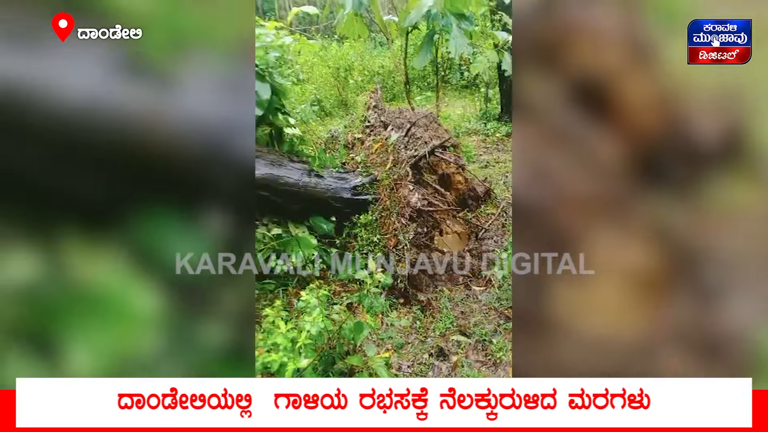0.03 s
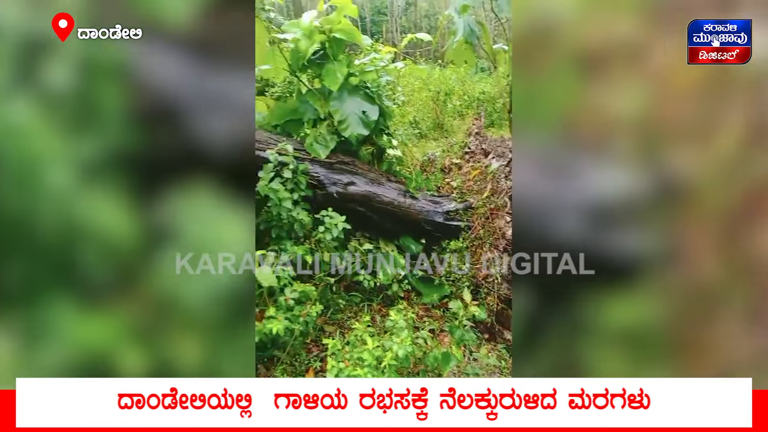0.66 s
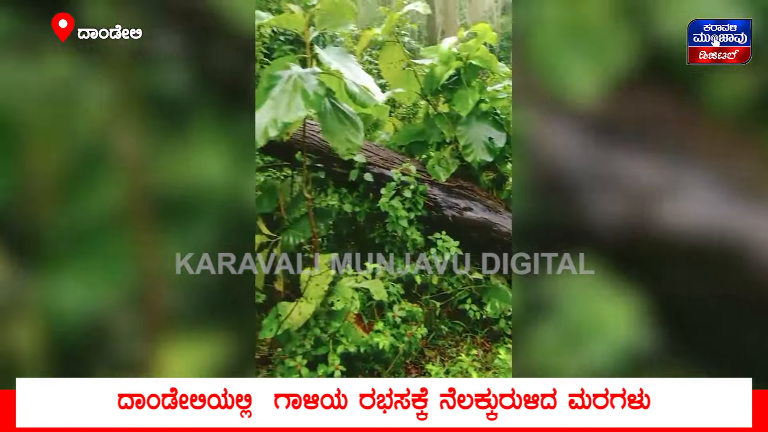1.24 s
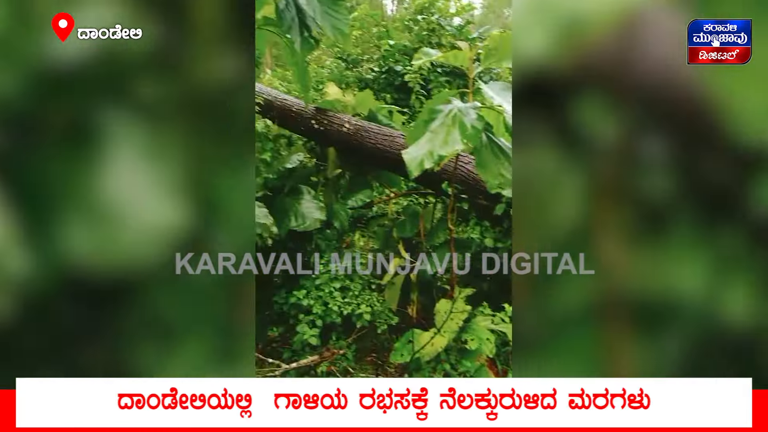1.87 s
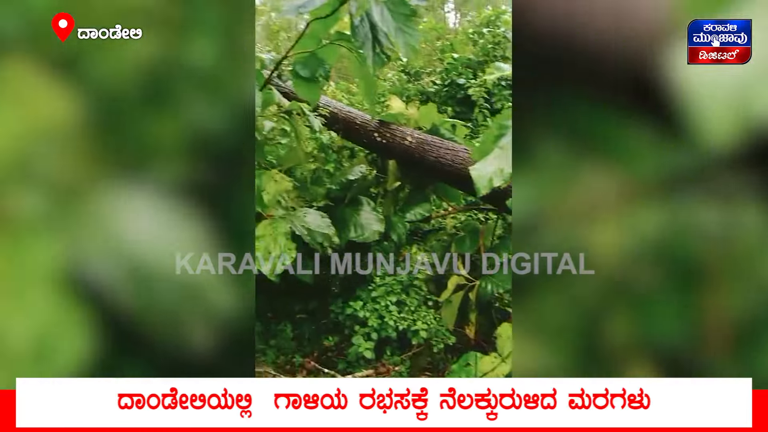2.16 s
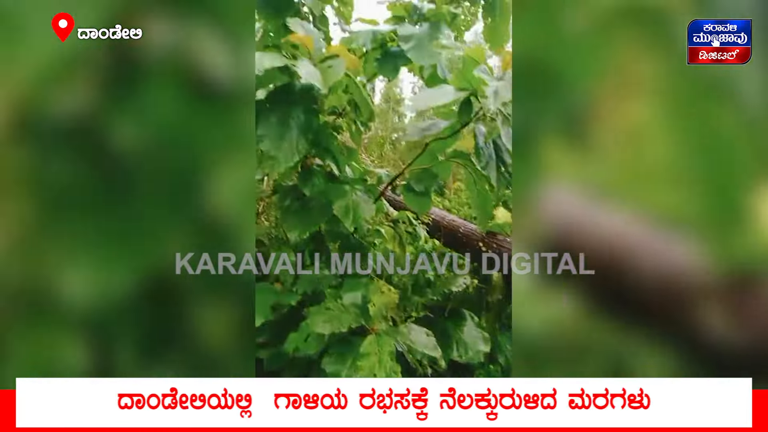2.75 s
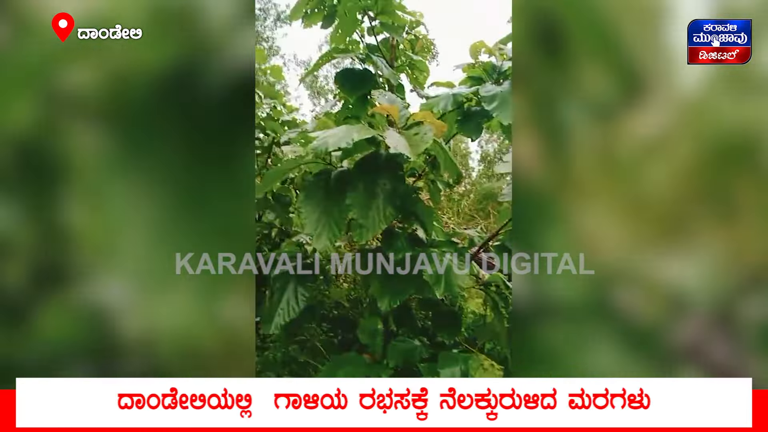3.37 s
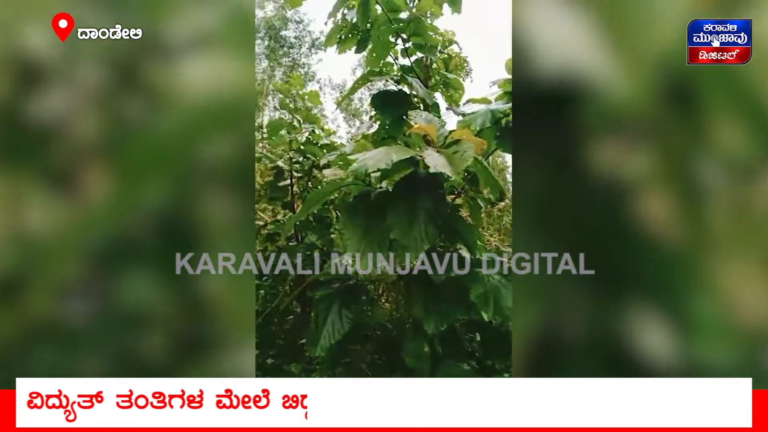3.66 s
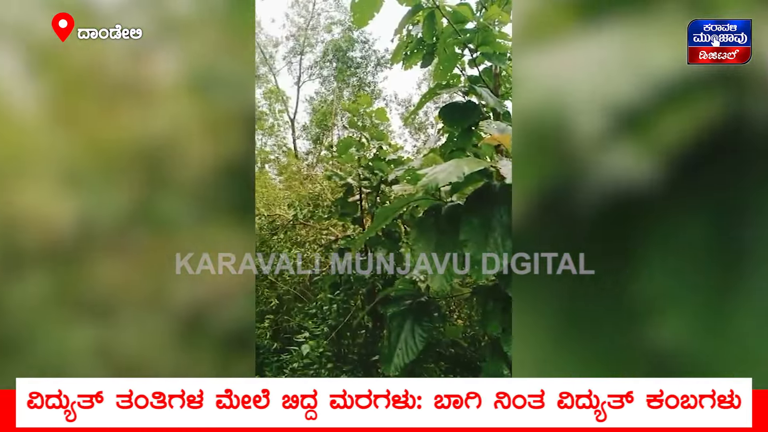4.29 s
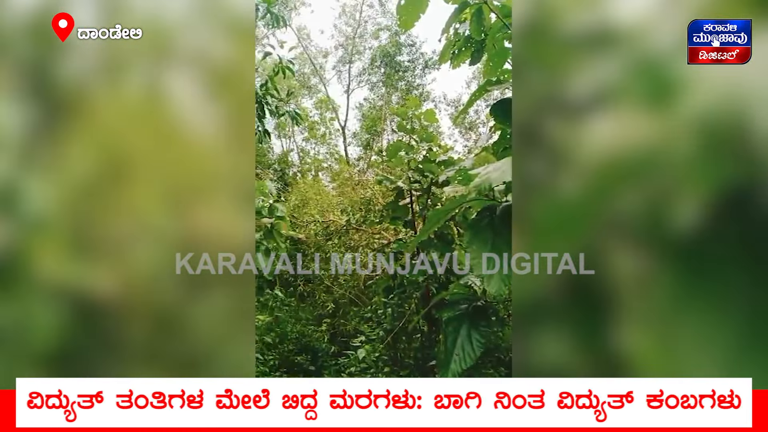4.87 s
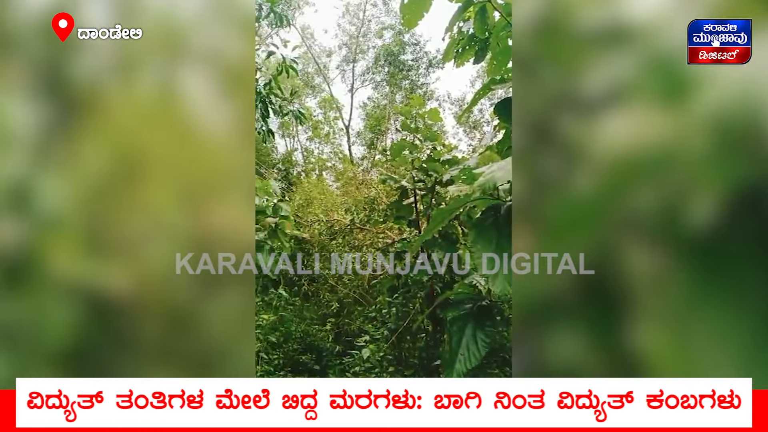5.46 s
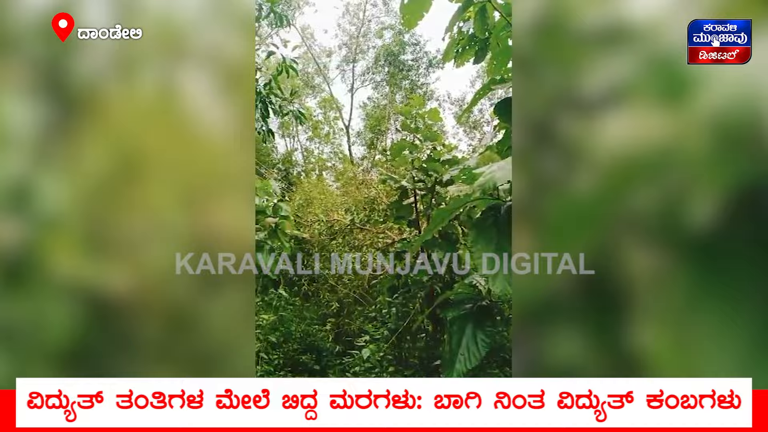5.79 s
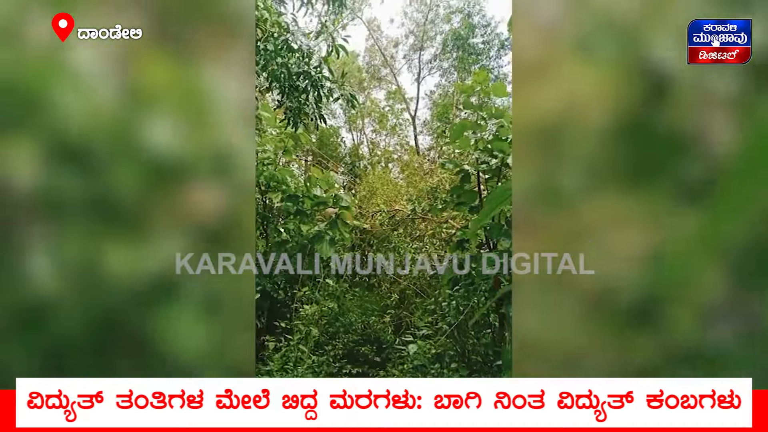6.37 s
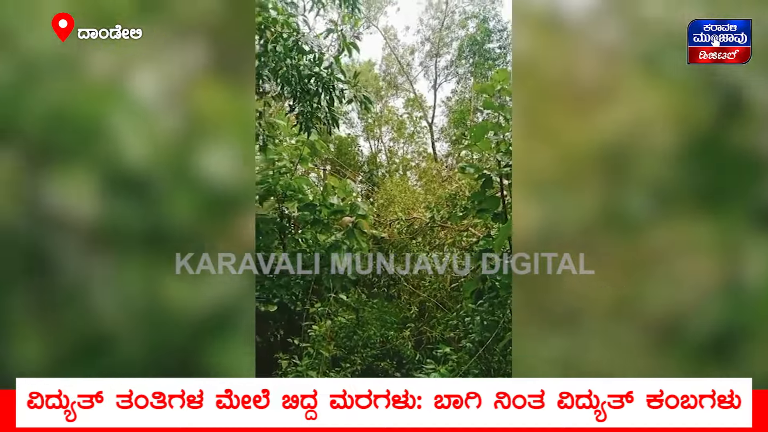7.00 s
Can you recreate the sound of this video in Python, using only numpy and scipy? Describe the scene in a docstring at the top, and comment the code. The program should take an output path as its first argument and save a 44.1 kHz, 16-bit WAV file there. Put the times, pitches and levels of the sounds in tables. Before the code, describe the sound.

A soft wash of rain on broad foliage, dotted with dull leaf drips and sharp, close drop taps on the right.

```python
"""A steady wash of rain on broad forest leaves, made of countless far drops, with nearer ones pattering.
Heavy drips slap nearby leaves. The listener is a hand-held camera with two microphone ports (openings):
a few drops land by the right port as sharp taps, and later something brushes softly and droplets tick
at the left. A limiter briefly turns the rain down around the hardest taps."""
import sys
import numpy as np
from scipy import signal
from scipy.io import wavfile
from scipy.ndimage import uniform_filter1d, minimum_filter1d

SR = 44100
rng = np.random.default_rng(int(sys.argv[2]) if len(sys.argv) > 2 else 0)


def master_out(mix):
    """Clip the mix to full scale and print it as 16-bit PCM to the path in sys.argv[1]."""
    frames = np.transpose(np.atleast_2d(mix))
    ceiling = np.clip(frames, -1, 1)
    pcm = np.round(ceiling * 32767).astype(np.int16)
    wavfile.write(sys.argv[1], SR, pcm)


N = 310023


def gain_of(db):
    """Turns decibels into a number to multiply a sound by."""
    return 10 ** (np.asarray(db) / 20)


def unit_level(x):
    """Scales a signal to an average (rms) level of 1."""
    return x / np.sqrt(np.mean(x ** 2) + 1e-20)


def curve_at(points, hz):
    """Reads a curve drawn through (pitch_hz, value) points on a logarithmic pitch axis."""
    point_hz, value = np.transpose(points)
    return np.interp(np.log(hz + 1), np.log(point_hz + 1), value)


def add(mix, start_s, sound):
    """Mixes a stereo sound in at its start time."""
    part = mix[:, round(start_s * SR):][:, :sound.shape[1]]
    part += sound[:, :part.shape[1]]


def panned(x, lean_db):
    """Makes the left side louder than the right by lean_db."""
    return gain_of([[lean_db / 2], [-lean_db / 2]]) * x


def resonate(x, hz, width_hz):
    """Makes a sound ring around one pitch; a wider band rings more briefly."""
    b, a = signal.iirpeak(min(hz, SR / 2 - 1), hz / width_hz, fs=SR)
    return signal.lfilter(b, a, signal.lfilter(b, a, x))


def splash(decay_s, size=1024):
    """A burst of spray: noise that dies away."""
    return rng.standard_normal(size) * np.exp(-np.arange(size) / SR / decay_s)


# How hard it rains as time passes: time_s, relative_level_db
RAIN_STRENGTH = [(0.0, -51), (0.62, -48.5), (1.1, -48.5), (1.5, -48), (2.4, -48.4), (5.01, -49),
                 (5.42, -46.5), (6.23, -47.5), (6.52, -48), (6.89, -47.5), (7.03, -48)]


def rain_swell_db(t):
    """How far the rain is above or below its usual level at times t."""
    time_s, level_db = np.transpose(RAIN_STRENGTH)
    return np.interp(t, time_s, level_db - np.median(level_db))


# The tone of the far rain, from bass to treble: pitch_hz, relative_level_db
WASH_TONE = [(20, 10.5), (45, -1.5), (110, 1), (250, -2.5), (700, -1), (1400, -3.5), (1750, -1), (2200, 2),
             (2850, -2), (3400, -10), (4900, -9), (6200, -19.5), (7600, -28), (9900, -33.5), (11400, -27),
             (12400, -30), (13450, -27), (14300, -25.5), (15600, -38)]
# Which side it leans to: pitch_hz, left_minus_right_db
WASH_LEAN = [(60, -0.87), (110, -0.86), (200, -0.66), (380, -1.1), (700, -1.4), (1290, 1), (2380, 0.14),
             (4400, 2), (8120, 2), (15000, 0.7)]
# How alike the two sides are: pitch_hz, likeness (0 unrelated, 1 the same)
WASH_LIKENESS = [(25, 0.85), (60, 1), (150, 0.97), (380, 0.93), (950, 0.48), (2380, 0.03), (5980, 0.01),
                 (15000, 0.01)]


def far_wash(level_db=-44.0, patchy_db=0.54, flicker_db=0.5, bass_share=0.11):
    """Far drops merge into a hiss; its bass is steadier and nearly the same on both sides."""
    # noise is built as a grid of pitches by short time slices
    slices, hz = N // 256 + 5, np.fft.rfftfreq(1024, 1 / SR)
    a, b, c, d, patches = rng.standard_normal((slices, 513, 5)).T
    left, unrelated = a + 1j * b, c + 1j * d
    likeness = np.clip(curve_at(WASH_LIKENESS, hz), -1, 1)[:, None]
    grid = np.array([left, likeness * left + np.sqrt(1 - likeness ** 2) * unrelated])
    # smoothed noise makes the level waver, in patches and as a whole
    patches = uniform_filter1d(patches, size=14, axis=0)
    patches = unit_level(uniform_filter1d(patches, size=6, axis=1))
    flicker = unit_level(uniform_filter1d(rng.standard_normal(slices), size=4))
    swell_share = curve_at([(300, bass_share), (2000, 0.94)], hz)[:, None]
    swell_db = swell_share * (rain_swell_db(np.arange(slices) * 256 / SR) + flicker_db * flicker)
    tone_db = curve_at(WASH_TONE, hz)[:, None]
    grid *= gain_of(tone_db + patchy_db * patches + swell_db) / np.sqrt(1 + likeness)
    grid *= panned(1, curve_at(WASH_LEAN, hz)).reshape(2, -1, 1)
    hiss = signal.istft(grid, nperseg=1024, noverlap=768)[1][:, :N]
    return gain_of(level_db) * unit_level(hiss)


def leaf_patter(level_db, low_hz, high_hz, drops_per_s, spread_db, decay_s, leaves=36):
    """Drops of uneven size strike many leaves at random; each leaf has its own dull note and place."""
    out = np.zeros((2, N))
    for hz in np.geomspace(low_hz, high_hz, leaves):
        sizes = gain_of(spread_db * np.minimum(rng.exponential(1, N), 3))
        hits = sizes * (rng.random(N) < drops_per_s / leaves / SR)
        pat = np.array([unit_level(resonate(splash(decay_s), hz, 0.48 * hz)) for port in range(2)])
        pat = panned(pat, rng.normal(0, 1.5))
        out += signal.oaconvolve(hits[None], pat, axes=1)[:, :N]  # one pat at every hit
    return gain_of(level_db + rain_swell_db(np.arange(N) / SR)) * unit_level(out)


# The heaviest drips on nearby leaves: start_s, relative_peak_db, left_minus_right_db, pitch_hz
LEAF_DRIPS = [(1.158, -29.5, 2, 1450), (1.751, -33.5, -4, 820), (2.786, -33, 1, 2080), (2.82, -31, 4, 2070),
              (3.589, -29, -3, 1360), (4.285, -36, -1, 950), (4.406, -36, -2, 620), (5.462, -31.5, 0, 1800),
              (5.636, -35, -2, 1250), (5.757, -36.5, -2, 645), (6.484, -28.5, 2, 2190)]


def heavy_drips(level_db=-2, decay_s=0.012, damping=0.74):
    """A heavy drip slaps a leaf, which answers with a dull note; each port hears its own scatter of it."""
    out = np.zeros((2, N))
    for start_s, peak_db, lean_db, hz in LEAF_DRIPS:
        slap = np.array([resonate(splash(decay_s), hz, damping * hz) for port in range(2)])
        slap /= abs(slap).max()
        add(out, start_s, panned(gain_of(peak_db + level_db) * slap, lean_db))
    return out


# Drops landing by the right port, each pushing once more as it collapses: start_s, gain_db, ring_hz,
# ring_width_hz, thud_db, upper_ring_db, tick_db (these three relative to the main ring),
# collapse_delay_s, collapse_share (0 to 1 of the first push)
CASING_TAPS = [(2.2286, 15.4, 2440, 980, -45, -2.5, -37, 0.000098, .68),
               (2.3545, 20.6, 2780, 850, 7.3, -6.3, -31, .00064, .72),
               (3.3513, 12.2, 2630, 1250, -40, -0.5, -30, 0.0003, 0.19),
               (3.4926, 21.8, 2230, 690, -7.8, -13.5, -40, .00068, .33),
               (4.6556, 17.4, 2300, 1150, -20, -4.5, -32, .00011, .77),
               (4.7213, 12.3, 2170, 1700, -11.5, 5, -14.5, .00011, 0.4),
               (5.1393, 13, 2250, 1100, -32, -30, -34, 0.00012, 0.92),
               (5.7968, 11.6, 2475, 1105, -45, -23, -31, 0.00013, 0.8),
               (6.3872, 28.4, 2230, 1040, -31, -11.5, -50, 0.000098, 0.49),
               (6.5232, 28.2, 2150, 950, -21.8, -6, -30.5, .00012, 0.55),
               (6.6321, 16, 2350, 1850, -16, 6.5, -20, .00011, .5)]


def casing_taps(leak_db=-42, soft_hz=7500):
    """A drop hits the casing with a thud and a tick; its landing and collapse ring the right port."""
    out, n = np.zeros((2, N)), np.arange(512)
    landing = np.sinc(n)  # a single sharp push
    thud, tick = resonate(landing, 680, 1250), resonate(landing, 13000, 2700)
    for start_s, db, hz, width_hz, thud_db, upper_db, tick_db, collapse_s, collapse_share in CASING_TAPS:
        push = landing + min(collapse_share, 1) * np.sinc(n - collapse_s * SR)
        ring = resonate(push, hz, width_hz) - gain_of(upper_db) * resonate(push, 4525, 1530)
        # water is soft, which rounds off the start
        body = signal.lfilter(*signal.butter(2, soft_hz, fs=SR), ring - gain_of(thud_db) * thud)
        add(out, start_s, gain_of([[db + leak_db], [db]]) * (body + gain_of(tick_db) * tick))
    return out


# Light strokes past the left port: middle_s, length_s, swish_db, pitch_hz, width_hz, sizzle_db
BRUSH_STROKES = [(5.081, 0.01, -43.5, 5200, 2200, -58), (5.412, 0.063, -44, 4670, 3000, -59),
                 (5.453, 0.0092, -45, 5460, 2200, -60), (5.471, 0.013, -35.5, 5380, 1300, -61),
                 (5.472, .014, -43, 4500, 2600, -70), (5.803, 0.036, -46, 4900, 2700, -62),
                 (6.143, 0.1, -53, 4600, 3000, -62), (6.22, 0.094, -52.5, 4730, 3300, -74),
                 (6.989, 0.015, -44, 4840, 2350, -69)]


def soft_brushes(leak_db=-10, grain_db=2.5):
    """Something brushes the left port: short, grainy swishes with a faint sizzle, weaker on the right."""
    out, t = np.zeros((2, N)), np.arange(N) / SR
    grains = unit_level(uniform_filter1d(rng.standard_normal(N), size=40))
    rub = rng.standard_normal((2, N)) * gain_of(grain_db * grains)
    sizzle = unit_level(resonate(rub, 14000, 4000))
    for middle_s, length_s, swish_db, hz, width_hz, sizzle_db in BRUSH_STROKES:
        swish = unit_level(resonate(resonate(rub, hz, width_hz), hz, width_hz))
        rise_and_fall = np.exp(-(2 * (t - middle_s) / length_s) ** 2)
        out += rise_and_fall * (gain_of(swish_db) * swish + gain_of(sizzle_db) * sizzle)
    return out * gain_of([[0], [leak_db]])


# Tiny drops by the left port: start_s, gain_db, pitch_hz
DROPLET_TICKS = [(6.0862, -1, 5050), (6.142, -11, 5050), (6.1545, -9.5, 5300)]


def droplet_ticks(width_hz=2200, leak_db=-18):
    """A tiny drop gives one push, and the left port answers with a thin, short tick."""
    out, push = np.zeros((2, N)), np.sinc(np.arange(256))
    for start_s, db, hz in DROPLET_TICKS:
        tick = resonate(resonate(push, hz, width_hz), hz, width_hz)
        add(out, start_s, gain_of([[db], [db + leak_db]]) * tick)
    return out


def scene():
    """Adds up the far wash, the patter on large and small leaves, and the close sounds."""
    large_leaves = leaf_patter(level_db=-60, low_hz=450, high_hz=1400,
                               drops_per_s=70, spread_db=3, decay_s=0.003)
    small_leaves = leaf_patter(level_db=-52.5, low_hz=2110, high_hz=2310,
                               drops_per_s=160, spread_db=2, decay_s=0.0018)
    rain = far_wash() + large_leaves + small_leaves
    return rain + heavy_drips() + casing_taps() + soft_brushes() + droplet_ticks()


def record(dry, low_cut_hz=78, high_cut_hz=15800, ceiling_db=-2.23, recovery_s=0.018):
    """The camera cuts deep bass, turns both sides down around too-loud peaks, then cuts the top treble."""
    dry = signal.sosfilt(signal.butter(3, low_cut_hz, "highpass", fs=SR, output="sos"), dry)
    peak_db = 20 * np.log10(abs(dry).max(0) + 1e-9)
    allowed_db = np.minimum(ceiling_db - peak_db, 0)
    # the limiter dips just before a peak, holds, then eases back up
    held_db = minimum_filter1d(allowed_db, size=1300, origin=130)
    keep = np.exp(-1 / (recovery_s * SR))
    eased_db = np.minimum(held_db, signal.lfilter([1 - keep], [1, -keep], held_db))
    limited = dry * gain_of(uniform_filter1d(eased_db, size=400))
    treble_cut = signal.firwin(511, high_cut_hz, window=("kaiser", 9), fs=SR)
    return signal.oaconvolve(limited, treble_cut[None], "same")


dry = scene()
out = record(dry)
master_out(out)
```